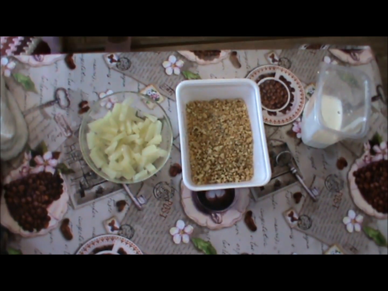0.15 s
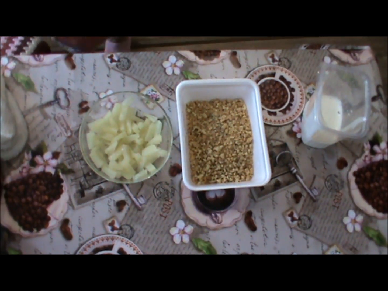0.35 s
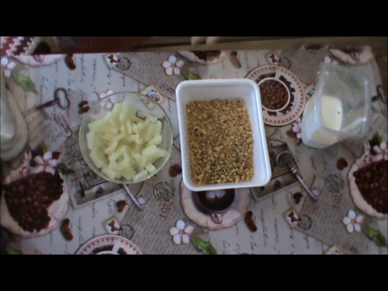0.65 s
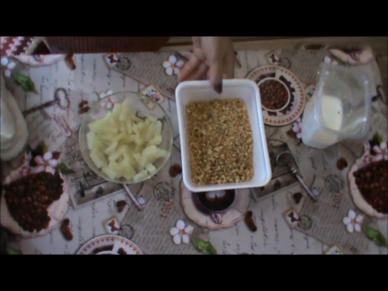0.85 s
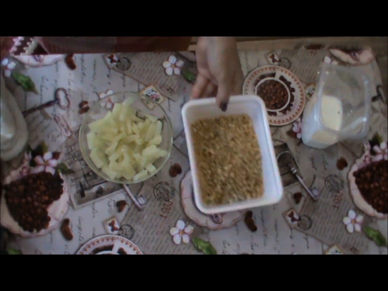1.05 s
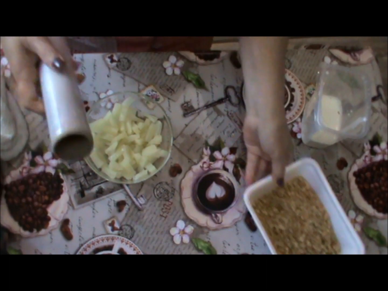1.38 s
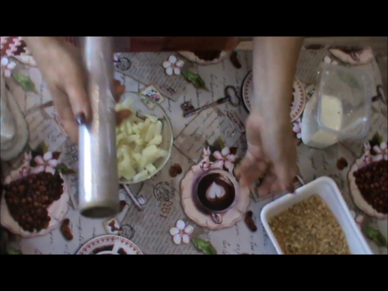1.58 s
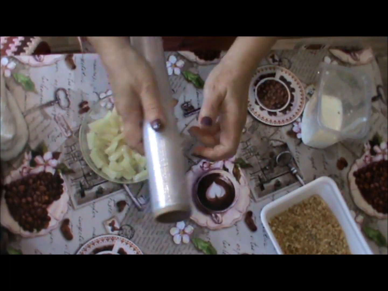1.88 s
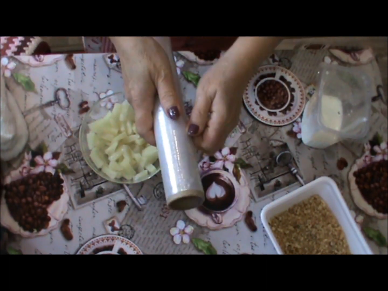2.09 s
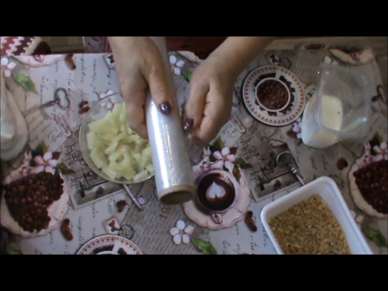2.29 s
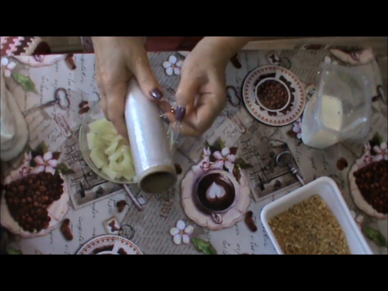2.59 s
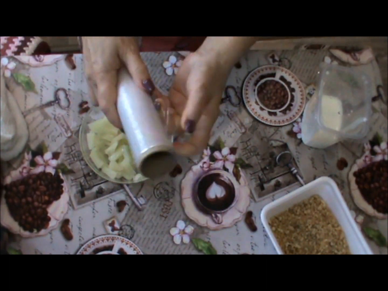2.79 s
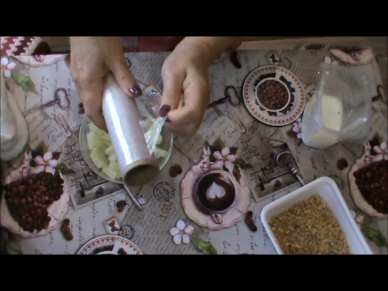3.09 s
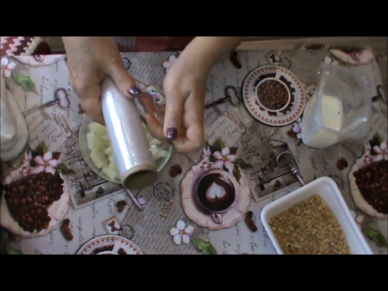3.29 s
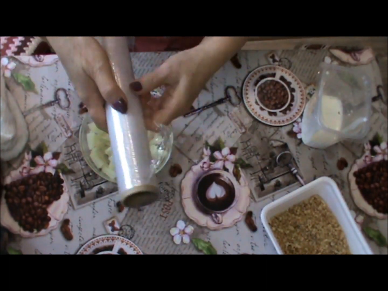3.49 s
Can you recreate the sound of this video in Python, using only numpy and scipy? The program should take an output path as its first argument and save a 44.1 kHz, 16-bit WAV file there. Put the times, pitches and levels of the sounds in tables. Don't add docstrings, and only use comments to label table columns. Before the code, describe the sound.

Cling film is picked, snapped and peeled from its roll in crinkly jerks, after a brief cloth rustle and a plastic tray sliding over oilcloth; close microphone in a small room with faint hiss and hum.

```python
import sys
import numpy as np
from scipy import signal
from scipy.fft import rfft, irfft
from scipy.io import wavfile
from scipy.ndimage import uniform_filter1d

SR = 44100
rng = np.random.default_rng(int(sys.argv[2]) if len(sys.argv) > 2 else 0)


def how_loud(loudness_db):
    steps = np.asarray(loudness_db, float) / 20
    return 10 ** steps


def store_wav(level_fs):
    pcm = np.round(np.clip(np.atleast_2d(level_fs), -1, 1) * 32767)
    wavfile.write(sys.argv[1], SR, pcm.T.astype(np.int16))


N = 160965
TIME_S = np.arange(N) / SR
OPPOSITE = np.array([[1], [-1]])


def unit(x):
    return x / np.sqrt(np.mean(x ** 2))


def colour(x, table):
    hz, db = np.array(table, float).T
    f = np.fft.rfftfreq(len(x), 1 / SR) + 1
    gain_db = np.interp(np.log(f), np.log(hz), db, left=db[0] - 16.0, right=-90)
    return irfft(rfft(x) * how_loud(gain_db), len(x))


def band(x, hz, q):
    return signal.lfilter(*signal.iirpeak(hz, max(q, hz / 14000), SR), x)


def crackle(rate_hz, scatter_db):
    chance, sign, size = rng.random((3, N))
    size_db = np.minimum(-scatter_db * np.log(size + 1e-9), 12)
    clicks = (chance < rate_hz / SR) * np.sign(sign - 0.5) * how_loud(size_db)
    smear = rng.standard_normal(64) * np.exp(-np.arange(64) / 14)
    smear = smear / np.sqrt(np.sum(smear ** 2))
    return unit(clicks + 0.62 * np.convolve(clicks, smear)[:N])


def walk(rate_hz):
    k = int(SR / rate_hz)
    steps = np.repeat(rng.standard_normal(N // k + 1), k)
    return unit(uniform_filter1d(steps, k)[:N])


def curve(table, col):
    a = np.array(table, float)
    return np.interp(TIME_S, a[:, 0], a[:, col], left=-120, right=a[-1, col])


def bursts(table, grit, q, fall):
    loose_hz = 1420
    out = np.zeros(N)
    for s, rise_s, db, hz in table:
        a = slice(max(int((s - 0.1) * SR), 0), int((s + 0.18) * SR))
        u = (TIME_S[a] - s) / rise_s
        sharp = band(grit[a], hz, q * min(1, loose_hz / hz) ** 0.5)
        ring = unit(band(sharp, hz, q / 3))
        power = uniform_filter1d(ring ** 2, size=int(rise_s * SR))
        ring = ring / np.sqrt(power + 0.089)
        swell = np.where(u < 0, np.exp(-u ** 2 / 2), np.exp(-np.abs(u) / fall))
        out[a] += how_loud(db) * ring * swell
    return out


# f/Hz, level/dB
FLOOR_COLOUR = [(20, 2), (70, -3), (160, 0.1), (400, -2.5), (1000, -4), (2500, -12.5), (7000, -17),
                (15800, -23.3)]
# f/Hz, level/dB
FLOOR_SIDE = [(30, -28), (70, -18.5), (250, -11.5), (4000, -2), (6000, -14), (16000, -15)]


def floor():
    hum_hz, hum_db, floor_db = 198.6, -58.5, -46.5
    mid = colour(rng.standard_normal(N), FLOOR_COLOUR)
    side = colour(colour(rng.standard_normal(N), FLOOR_COLOUR), FLOOR_SIDE)
    hum = how_loud(hum_db + 2.3 * walk(6)) * np.sin(2 * np.pi * hum_hz * TIME_S)
    gain = how_loud(floor_db + 0.5 * walk(3.2)) / np.sqrt(np.mean(mid ** 2))
    return gain * (mid + side * OPPOSITE) + hum


# peak t/s, rise/s, level/dB, centre f/Hz
RUSTLES = [(0.339, 0.0077, -32.5, 8900), (2.9, 0.0019, -31, 9400), (2.162, 0.0069, -42, 8000),
           (2.25, 0.018, -46, 5000), (2.3, .015, -47, 6900), (.360, 0.0029, -28, 9800),
           (.367, 0.0044, -31.5, 8100), (.467, 0.0039, -29.5, 8100), (.47, 0.0054, -37.5, 4900),
           (0.00088, 0.0039, -40.5, 5600), (2.365, 0.0092, -30, 1700), (2.40, 0.012, -38.5, 2600),
           (2.64, .012, -36, 5500), (2.42, 0.021, -41.5, 530), (2.5, 0.012, -45, 560),
           (.876, .004, -38, 1630), (.937, .006, -43, 1300), (0.268, 0.024, -48.5, 3300),
           (2.756, .006, -39, 8000), (2.5, .02, -49.5, 2800), (1.38, 0.0206, -45.5, 133)]


def rustles():
    grit = crackle(8000, 2.5) + 0.5 * rng.standard_normal(N)
    grit = colour(grit, [(60, 0), (15800, 0)])
    return bursts(RUSTLES, grit, q=1.64, fall=2.05)


# t/s, peak level/dB, centre f/Hz
TICKS = [(.359, -20, 9000), (.366, -20, 9500), (.3705, -24, 6000), (.328, -27, 7000), (.334, -25, 6500),
         (.4585, -28, 7000), (.8835, -34, 2020), (.935, -32, 1700), (2.147, -31, 11000),
         (2.169, -27, 11500), (2.174, -28, 6500), (2.198, -30, 7500), (2.243, -34, 4500),
         (2.261, -36, 9000), (2.287, -34, 6000), (2.3, -34, 7000), (2.306, -34, 6000), (2.455, -34, 11000),
         (2.468, -38, 10500), (3.464, -26, 4000), (3.478, -25, 2600), (3.062, -28, 9000),
         (3.078, -26, 8000), (3.083, -23, 8000), (3.088, -23, 10000), (3.092, -25, 8000),
         (3.101, -22, 7000), (3.121, -20, 6000), (3.129, -19, 5500), (3.147, -20, 7500), (3.153, -20, 8500),
         (3.158, -15, 5000), (3.165, -22, 9000), (3.392, -25, 3300), (3.536, -30, 8000), (3.575, -36, 9000)]


def ticks():
    decay_s, q = 0.00077, 1.6
    out, t = np.zeros(N + 512), np.arange(512) / SR
    for s, db, hz in TICKS:
        click = rng.standard_normal(512) * np.exp(-t / decay_s)
        click = band(band(click, hz, q), hz, q)
        i = int(s * SR)
        out[i:i + 512] += how_loud(db) * click / np.abs(click).max()
    return out[:N]


# peak t/s, rise/s, level/dB, f/Hz
DRUMS = [(2.905, .008, -33.5, 694), (2.95, 0.014, -34.5, 897), (2.975, 0.0087, -31.5, 630),
         (2.993, .008, -23, 556), (3.04, .015, -42.5, 410), (3.095, .022, -27, 414),
         (3.121, .011, -23, 425), (3.13, 0.019, -27.5, 555), (3.272, 0.0076, -30.5, 550),
         (3.278, 0.0094, -24, 1160), (3.29, 0.014, -28, 1500), (3.0, 0.011, -24.5, 4700),
         (2.95, 0.014, -29, 5640), (2.925, 0.011, -31.5, 2410), (3.19, 0.02, -35, 1760),
         (3.175, .012, -35, 4760), (3.45, 0.0067, -36, 2270), (.364, .009, -37.5, 3550),
         (0.37, 0.015, -39.5, 4950), (0.486, .015, -46, 2200), (2.754, .005, -32, 1100),
         (3.56, .012, -43, 2100), (3.262, 0.0073, -32, 5100), (0.34, .005, -29.5, 9400),
         (.344, .004, -29, 11500), (2.857, .003, -28.5, 1410), (2.857, .002, -37, 5100),
         (2.316, 0.0028, -36, 1300), (2.205, 0.0085, -43, 1304), (3.305, .012, -30.5, 2250),
         (3.305, 0.007, -40, 339), (3.03, .008, -36.5, 560), (3.482, 0.0086, -36, 2330),
         (3.18, .01, -34, 1500), (3.12, 0.032, -36.5, 780), (3.0, .01, -30, 5750), (2.95, .008, -34, 3900),
         (0.81, 0.0035, -41, 1650)]


def drums():
    return bursts(DRUMS, crackle(3000, 2.2), q=21.7, fall=1.22)


# t/s, peak
# level/dB, ring f/Hz, ring share/dB
FILM_SNAPS = [(0.8257, -37.5, 5500, 7.5), (0.871, -42.5, 1600, 16.5), (2.0162, -19, 3190, 0),
              (2.158, -21, 9000, -3.5), (2.184, -27, 1350, -6), (2.191, -19, 1350, -4.5),
              (2.2124, -25.5, 1490, -10), (2.2664, -34, 6370, 6), (2.2805, -27.5, 1690, 1),
              (2.312, -25.5, 1490, 5.5), (2.3436, -25, 1500, 4.5), (2.3555, -17, 1490, 3),
              (2.3612, -12, 6100, 0), (2.3836, -12.5, 5900, 2), (2.3992, -19, 1380, 0.5),
              (2.4376, -29.5, 9000, 0),
              (2.5063, -20, 1120, -7.5), (2.584, -24, 8600, 2), (2.6195, -15, 4910, -4),
         (2.6374, -16.5, 5610, -16), (2.6465, -19, 4040, -10), (2.7471, -9, 11000, -2),
         (2.7567, -24, 1080, 0), (2.8545, -31, 1480, 6), (2.8791, -9.5, 4530, 2), (3.1067, -25, 6000, 7),
         (3.112, -21.5, 6750, 7), (3.1406, -23, 4900, 11), (3.239, -31, 10000, 9),
         (3.2906, -11, 1480, -8.5), (3.4436, -23.5, 2280, -1), (3.5503, -28, 2120, 1),
         (3.596, -38.5, 10000, 7)]
# f/Hz, level/dB
CRACK_COLOUR = [(700, -10), (1500, -2.5), (4000, -1), (9000, -5.5), (16800, -11)]


def snaps():
    attack_s, crack_s, rattle_s = 0.00073, 0.0012, 0.007
    rattle_db, snap_db, ring_q = -12.5, -2, 3.8
    lead = 64
    out, t = np.zeros(N + 2048), np.arange(2048) / SR
    for s, db, hz, ring_db in FILM_SNAPS:
        noise = rng.standard_normal((2, 2048))
        crack = noise[0] * np.exp(-t / crack_s) * np.minimum(t / attack_s, 1)
        ring = np.roll(band(crack, hz, ring_q), lead)
        rattle = how_loud(rattle_db) * noise[1] * np.exp(-t / rattle_s)
        crack = colour(np.roll(crack + rattle, lead), CRACK_COLOUR)
        snap = crack / np.abs(crack).max() + how_loud(ring_db) * ring / np.abs(ring).max()
        i = int(s * SR) - lead
        out[i:i + 2048] += how_loud(db + snap_db) * snap
    return out[:N]


# t/s, level/dB
SLIDE = [
    (.895, -54.5),
    (.946, -38),
    (1.016, -42.5),
    (1.108, -33.5),
    (1.222, -44),
    (1.312, -35.5),
    (1.544, -39),
    (1.65, -44.5),
    (1.78, -68),
]
# f/Hz, level/dB
SLIDE_COLOUR = [(600, -10.5), (1200, -5.5), (2200, -7), (4400, -0.5), (9000, -1.5), (13000, -2),
                (15800, -9.5)]


def tray():
    hiss = unit(colour(crackle(14000, 1.6) + rng.standard_normal(N), SLIDE_COLOUR))
    stop_db = 400 * np.maximum(TIME_S - SLIDE[-1][0], 0)
    return hiss * how_loud(curve(SLIDE, 1) + 0.99 * walk(40.0) - 0.5 - stop_db)


# t/s, f/Hz, level/dB
SQUEAK = [
    (2.566, 7530, -53),
    (2.573, 7700, -35),
    (2.579, 8010, -35),
    (2.582, 8780, -27),
    (2.592, 8600, -35.5),
    (2.612, 8530, -38.5),
    (2.64, 8550, -59),
    (2.66, 8600, -66),
]


def squeak():
    hz = curve(SQUEAK, 1) * (1 + 0.038 * walk(2000))
    phase = 2 * np.pi * np.cumsum(hz) / SR
    whistle = np.sin(phase) + how_loud(-19) * np.sin(2 * phase)
    return how_loud(curve(SQUEAK, 2) + 3 * walk(400)) * whistle


# t/s, level/dB, treble share/dB
PEEL = [
    [(2.885, -25.5, -8), (2.893, -30.5, -5), (2.92, -28, -4), (2.937, -27.5, 4), (2.953, -25, -2),
     (2.975, -28.5, 0), (3.001, -21.5, 1.5), (3.025, -29, -1), (3.05, -33, -6)],
    [(3.1, -29.5, -7), (3.135, -28, -6), (3.165, -25.5, -4.5), (3.2, -31, -8), (3.232, -39, -9)],
    [(3.245, -35, 2), (3.27, -27.5, -1), (3.293, -23.5, 1.5), (3.325, -35, -3), (3.37, -41.5, -3)],
    [(3.393, -32.5, 1), (3.404, -39.5, 0), (3.438, -40, 0), (3.447, -33, -6), (3.465, -35.5, 1),
     (3.484, -37, -5), (3.504, -42.5, -4), (3.65, -49, -4)],
]
# f/Hz, level/dB
PEEL_COLOUR = [(250, -9), (450, -3), (1200, -1.5), (2500, -1), (4800, -0.5), (8000, -4.5), (12000, -7.5),
               (15800, -15)]
# f/Hz, sharpness Q, level/dB
TUBE = [(556, 25, -5), (1083, 27, -6), (1492, 48, -2.5), (330, 5.6, -6)]


def peel():
    treble_hz = 6500
    grit = unit(colour(crackle(5000, 2.0) + 0.5 * rng.standard_normal(N), PEEL_COLOUR))
    top = signal.sosfilt(signal.butter(2, treble_hz, "high", fs=SR, output="sos"), grit)
    low = signal.sosfilt(signal.butter(2, treble_hz, "low", fs=SR, output="sos"), grit)
    rows = sum(PEEL, [])
    body = low.copy()
    for hz, q, db in TUBE:
        body += how_loud(db + 8 + 3.5 * walk(25)) * band(low, hz, q)
    level_db = curve(rows, 1) + 1.65 * walk(150) - 2.5
    return (body - top * how_loud(curve(rows, 2))) * how_loud(level_db)


def room(near):
    t60_s, onset_s, room_db, side_gain = 0.3, 0.0031, -7, 0.41
    mid_colour = [(300, -2.0), (3000, 1.5), (15800, -4)]
    side_colour = [(300, 2.1), (1500, 3), (4000, 2.8), (8000, 1.3), (15800, 2.5)]
    t = np.arange(SR // 2) / SR
    tail = rng.standard_normal((2, SR // 2)) * how_loud(-60 * t / t60_s) * np.minimum(t / onset_s, 1)
    tail = tail / np.sqrt(np.sum(tail[0] ** 2))
    mid, side = (signal.fftconvolve(near, h)[:N] for h in tail)
    wet = colour(mid, mid_colour) + side_gain * colour(side, side_colour) * OPPOSITE
    return how_loud(room_db) * wet


def scene():
    slide = tray()
    near = rustles() + ticks() + drums() + snaps() + slide + squeak() + peel()
    pan_db = np.interp(TIME_S, [0.6, 1.2, 2.2, 2.9, 3.4], [0.1, -0.6, -0.1, 0.4, 0.9])
    direct = near * how_loud(np.array([pan_db, -pan_db]) / 2)
    slide_width = 0.19 * np.roll(slide, 90) * OPPOSITE
    return direct + room(near) + floor() + slide_width


def top_cut(x):
    return signal.sosfilt(signal.butter(12, 16980, fs=SR, output="sos"), x)


def record(dry):
    top = [(10, 0), (15900, 0), (16000, -24), (16900, -30)]
    mix = np.array([colour(c, top) for c in dry])
    return top_cut(mix)


dry = scene()
out = record(dry)
store_wav(out)
```